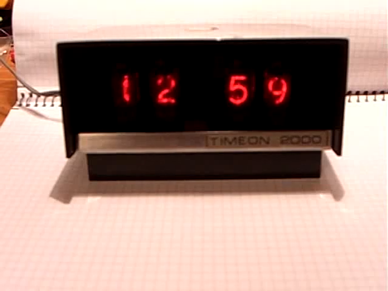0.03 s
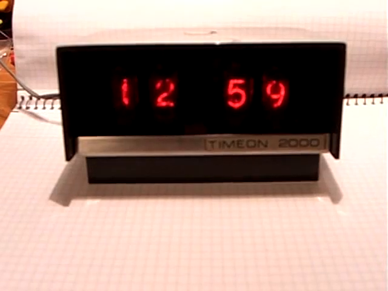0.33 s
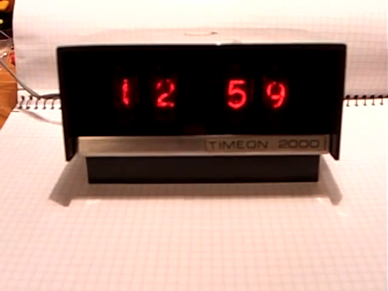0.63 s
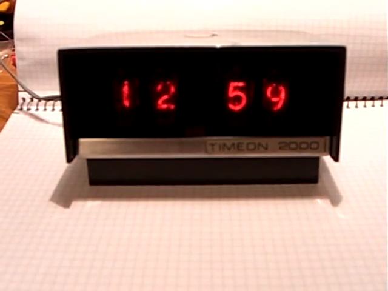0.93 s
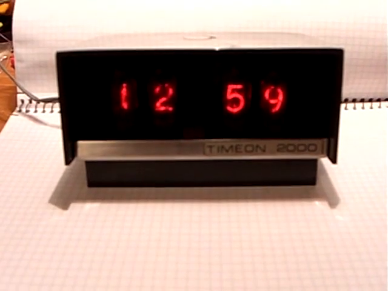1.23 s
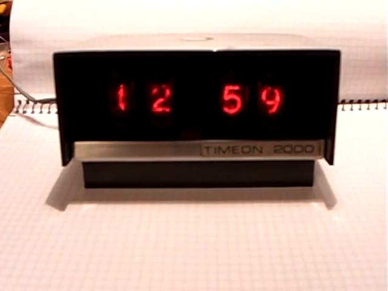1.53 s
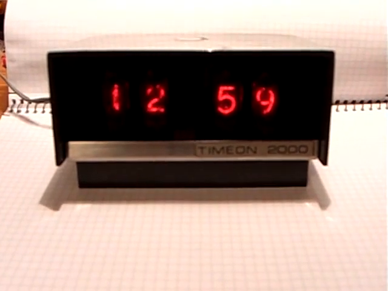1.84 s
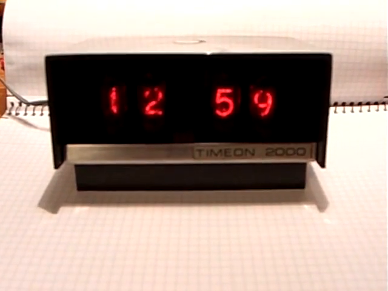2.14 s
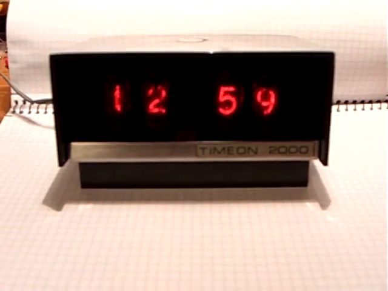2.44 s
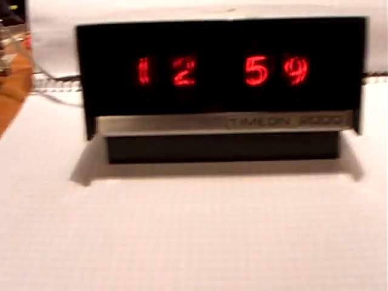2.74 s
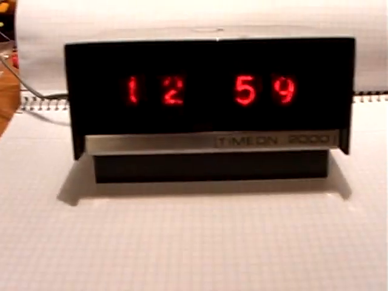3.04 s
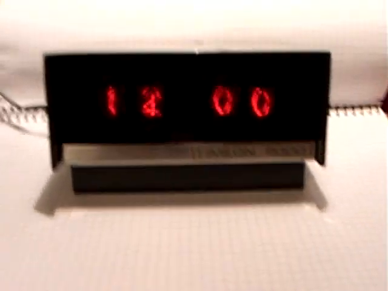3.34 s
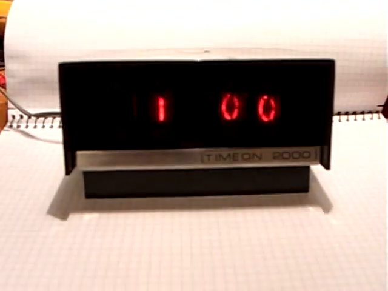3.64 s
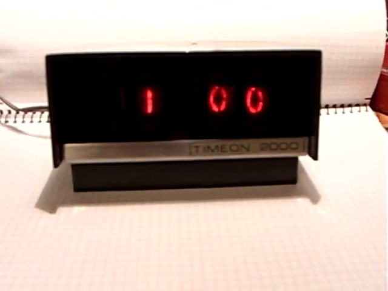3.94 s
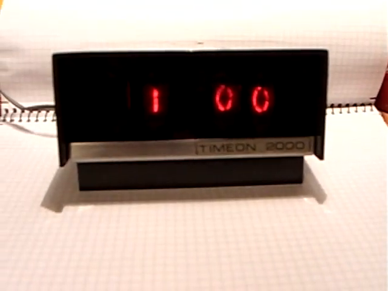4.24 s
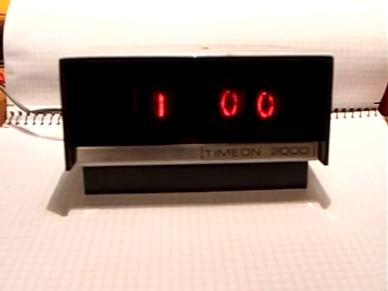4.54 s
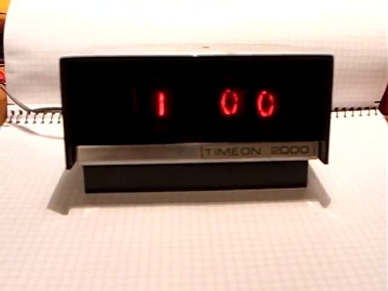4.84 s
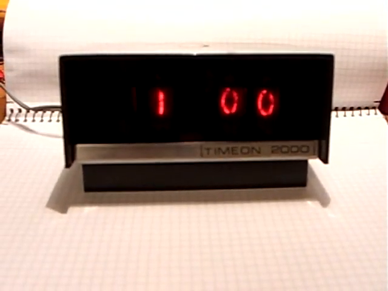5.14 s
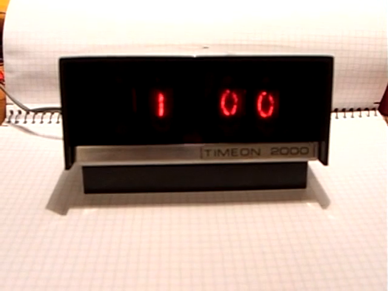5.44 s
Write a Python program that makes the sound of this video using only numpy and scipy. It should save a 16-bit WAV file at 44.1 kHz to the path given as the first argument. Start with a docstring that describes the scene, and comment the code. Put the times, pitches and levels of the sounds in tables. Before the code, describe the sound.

A low hum, even hiss and faint electrical buzz and whine fill a quiet room, with one light tick near the start. After a pause, a motor-driven digit clock close to the microphone changes its digits: the levers judder, snap sharply and knock in a plastic case over a low rumble. Soft, hissy rubbing runs between the snaps. A few lighter knocks follow as the mechanism settles, leaving the hiss.

```python
"""A low hum and hiss are heard first, with the faint buzz and whine of a small handheld camera, in a quiet
room. After one light snap and a pause, a motor-driven digit clock close by rolls over to the next hour.
Its levers judder, snap and knock over a low rumble, each contact exciting the damped normal modes of a
plastic case and its base. Between the snaps come soft rubbing strokes with a ringing hiss, perhaps from
handling the camera."""
import sys
import numpy as np
from scipy import signal
from scipy.fft import rfft, irfft, next_fast_len
from scipy.io import wavfile

SR = 44100
rng = np.random.default_rng(int(sys.argv[2]) if len(sys.argv) > 2 else 0)


def dump(signal):
    """Clip the signal to [-1, 1] and save it as 16-bit WAV at the path in sys.argv[1]."""
    limited = np.clip(np.atleast_2d(signal).T, -1, 1)
    pcm = np.round(limited * 32767).astype(np.int16)
    wavfile.write(sys.argv[1], SR, pcm)


N = 250488

# spectrum of the room's hiss: (frequency [Hz], relative density [dB])
HISS_SPECTRUM = [(21, -3), (71, -8.5), (126, -8), (191, -1.5), (261, -3), (321, -7), (401, -3.5),
                 (551, -7.5), (1110, -9.5), (3510, -13.5), (7010, -16), (11010, -17.5), (14010, -16),
                 (16010, -23.5)]
# the camera's two electronic tones: (frequency [Hz], level [dB])
WHINE_TONES = [(13184, -67.5), (15210, -63.5)]
# modes rung by the contacts and the rubbing: (frequency [Hz], t60 [s], relative level [dB])
BODY_MODES = [(504, 0.027, -20), (586, 0.032, -12), (748, 0.05, -21.5), (914, 0.027, -14),
              (1134, 0.011, -0.5), (1454, 0.021, -8.5), (1694, 0.018, -6), (2010, 0.0088, 2.5),
              (2994, 0.012, -1), (3500, 0.0082, 1.5), (4620, .008, -9.5), (6030, 0.0053, -8),
              (6320, 0.0094, -8.5), (7260, 0.0045, -2.5), (8130, 0.0071, -10), (9740, 0.0057, -12.5),
              (11690, 0.0083, -6), (12180, 0.004, -4), (14600, .006, -10)]
# normal modes of the base the clock stands on: (frequency [Hz], t60 [s], relative level [dB])
BASE_MODES = [(89, 0.05, -8), (150, 0.023, 0.5), (218, 0.027, 2.5), (301, 0.037, -1), (400, 0.03, -4.5)]
# hard contacts of the levers: (time [s], level [dB], favoured pitch [Hz], its boost [dB], treble [dB])
LEVER_SNAPS = [(0.181, -47, 2250, 1, 0), (2.5106, -40.5, 1550, 5, -1), (2.5936, -20, 540, -0.5, -2.1),
               (2.8534, -33.5, 1660, 13, -3.5), (2.9099, -29.5, 1550, 8.5, -0.5), (2.9888, -42, 3600, 4, 3),
               (3.1495, -20.5, 1330, 15, -1.3), (3.1562, -26.5, 560, 23, 9), (3.9987, -48.5, 2800, 9, -6)]
# the works rumble as they start and as they settle: (peak time [s], rise [s], fall [s], level [dB])
RUMBLE_SWELLS = [(2.55, 0.021, 1.8, -55), (3.52, 0.39, 0.87, -54.5)]
# spectrum of that rumble: (frequency [Hz], relative density [dB])
RUMBLE_SPECTRUM = [(41, -37), (121, -14.5), (221, -14.5), (335, -0.5), (455, -4.5), (655, -8.5),
                   (1210, -15.5), (3010, -28)]
# a lever judders twice, later the settling parts scuff: (peak time [s], rise [s], fall [s], level [dB])
JUDDER_SWELLS = [(2.531, .003, .075, -35.5), (2.59, 0.031, 0.019, -38.5), (4.112, .012, 0.042, -51.5),
                 (4.256, 0.018, .07, -53.5)]
# soft contacts: (time [s], level [dB], favoured pitch [Hz], its boost [dB], relative thud [dB])
LEVER_KNOCKS = [(2.5301, -35, 905, 18, -10), (2.541, -41, 1100, 0, 0), (2.568, -37, 880, 17, -16),
                (2.7103, -35.5, 560, 18, -15), (2.7917, -31.3, 915, 12, -10.5), (2.99, -52, 900, 4, 7),
                (3.074, -40.5, 1610, 15, -2), (3.132, -50.5, 905, 4, 5), (3.382, -53, 1700, 6, 8.5),
                (3.4022, -49, 1710, 15, -15), (3.4234, -41, 1360, 17, -5.5), (3.8423, -44.5, 790, 28, -12),
                (3.9986, -36.5, 740, 28.5, -23), (4.1255, -49.5, 1770, 13, -9), (4.253, -54.5, 706, 4, 3),
                (4.399, -50.5, 1135, 10, -12)]
# rubbing strokes: (peak time [s], rise [s], fall [s], favoured pitch [Hz], ring [dB], hiss [dB])
RUBBING_STROKES = [(2.62, .02, 0.78, 1400, -55, -62), (2.878, 0.066, 0.056, 1380, -46.5, -52.5),
                   (2.964, 0.042, 0.065, 1950, -45, -53.5), (3.03, .06, 0.027, 1950, -42, -52),
                   (3.068, 0.061, 0.1, 1720, -51, -44), (3.255, 0.14, 0.16, 1290, -48.5, -49),
                   (3.48, 0.062, 0.11, 1780, -46, -64), (3.566, 0.1, 0.058, 1980, -39, -43)]
# hiss of the early and the late strokes: (frequency [Hz], relative density [dB])
EARLY_HISS = [(2500, -14.5), (3750, 0), (4600, -11), (5500, -13), (6200, -1.5), (7600, -9), (8200, 0),
              (9100, -0.5), (10600, -7), (12300, -5), (14000, -18.5), (16000, -8)]
LATE_HISS = [(2500, -39), (4300, -7), (5300, -7), (6200, 3), (7300, -7), (8300, -5), (9000, -15),
             (10800, -14), (11600, -3), (13200, -6), (16000, -23)]
# narrow notches of the microphone channel: (frequency [Hz], width [Hz])
CHANNEL_NOTCHES = [(4360, 125), (6590, 130), (8690, 280), (10850, 170), (13010, 560)]


def undb(db):
    """Amplitude ratio of a level in decibels."""
    return 10 ** (np.asarray(db) / 20)


def unit(x):
    """Normalisation to rms 1."""
    return x / np.sqrt(np.mean(x ** 2))


def equal_energy(x):
    """Normalisation of a transient to the energy of 5 ms at rms 1."""
    return x * np.sqrt(.005 * SR / np.sum(x ** 2))


def colour(x, spectrum):
    """Spectral shaping by (frequency [Hz], level [dB]) points; rms 1."""
    hz, db = np.transpose(spectrum)
    size = next_fast_len(len(x), True)
    bin_hz = np.maximum(np.fft.rfftfreq(size, 1 / SR), 1)
    gain = undb(np.interp(np.log(bin_hz), np.log(hz), db))
    return unit(irfft(rfft(x, size) * gain, size)[:len(x)])


def band(hz, width_hz):
    """Response of one resonator to white noise; rms 1."""
    return unit(signal.lfilter(*signal.iirpeak(hz, hz / width_hz, fs=SR), rng.standard_normal(N)))


def fade(t, t60):
    """Exponential damping by 60 dB in t60."""
    return np.exp(-np.log(1000) * t / t60)


def swell(peak_s, rise_s, fall_s):
    """Exponential growth by 20 dB in rise_s and decay by 20 dB in fall_s; silent below -40 dB."""
    t = np.arange(N) / SR - peak_s
    db = -20 * np.maximum(-t / rise_s, t / fall_s)
    return undb(db) * (db > -40)


def background(hiss_db=-53, hum_db=-64):
    """Broadband noise is heard as an even hiss, narrowband noise as a wavering hum."""
    hum = band(hz=235, width_hz=6)
    hiss = colour(rng.standard_normal(N), HISS_SPECTRUM)
    return undb(hiss_db) * hiss + undb(hum_db) * hum


def camera_buzz(frame_hz=30, broad_db=-55, whistle_db=-56, burst_s=.0013):
    """Electrical interference: two noise bursts in each picture frame buzz, and two high tones whine."""
    t = np.arange(N) / SR
    frame, in_frame_s = np.divmod(t, 1 / frame_hz)
    bursts = sum(size * np.exp(-((in_frame_s - s) / burst_s) ** 2)
                 for s, size in [(.0189, 1), (.0228, .75)])
    fizz = undb(broad_db) * band(hz=5460, width_hz=6000) + undb(whistle_db) * band(hz=12460, width_hz=380)
    lower, upper = (undb(db) * np.sin(2 * np.pi * hz * t) for hz, db in WHINE_TONES)
    return bursts * fizz + lower + upper * (-1) ** frame  # the upper tone flips sign with every frame


def ring_modes(modes, spread_cycles=.45):
    """Free vibration is a sum of damped sines, here slightly detuned at random on each excitation."""
    t = np.arange(SR // 16) / SR
    hz, t60, db = np.transpose(modes)[:, :, None]
    detune, phase = rng.standard_normal((len(modes), 2)).T[:, :, None]
    cycles = hz * (1 + .01 * detune) * t
    onset = (1 - np.exp(-cycles / spread_cycles)) ** 2  # the wave takes a cycle or two to fill the shell
    return np.sum(undb(db) * onset * fade(t, t60) * np.sin(2 * np.pi * (cycles + phase)), axis=0)


def body_ring(pitch_hz, boost_db, treble_db, bright_hz=2300, width_octaves=.36):
    """Modal excitation: the contact point favours modes near one pitch, a hard contact the high ones."""
    hz, t60, db = np.transpose(BODY_MODES)
    favoured = np.exp(-(np.log2(hz / pitch_hz) / width_octaves) ** 2)
    tilt = np.clip(1 + np.log2(hz / bright_hz), 0, 2)
    return ring_modes(np.transpose([hz, t60, db + boost_db * favoured + treble_db * tilt]))


def impact(time_s, db, pitch_hz, boost_db, treble_db, thud_db):
    """Impulsive excitation: the case rings, the contact cracks briefly and the base thuds."""
    ring = equal_energy(body_ring(pitch_hz, boost_db, treble_db))
    t = np.arange(len(ring)) / SR
    highpass = signal.butter(4, 6000, "high", fs=SR, output="sos")
    grit = signal.sosfilt(highpass, rng.standard_normal(len(t)))
    crack_db = -14 + 2 * treble_db - boost_db / 2
    crack = undb(crack_db) * equal_energy(grit * fade(t, t60=.016))
    thud = undb(thud_db) * equal_energy(ring_modes(BASE_MODES))
    return np.pad(undb(db) * (ring + crack + thud), (int(time_s * SR), N))[:N]


def snaps():
    """A short contact has a wide spectrum: the sprung levers snap brightly and hardly move the base."""
    return sum(impact(*snap, thud_db=-36) for snap in LEVER_SNAPS)


def reverberation(x, echo_db=-25, t60=.14, cutoff_hz=4200):
    """Absorption in a small furnished room leaves weak, dull reflections that decay exponentially."""
    t = np.arange(SR // 3) / SR
    dull_noise = signal.lfilter(*signal.butter(1, cutoff_hz, fs=SR), rng.standard_normal(len(t)))
    tail = dull_noise * fade(t, t60)
    return undb(echo_db) * signal.fftconvolve(x, tail / np.linalg.norm(tail))[:N]


def slips(per_s, spread_db):
    """Stick-slip friction as a random train of impulses of uneven size; rms 1."""
    slipping = rng.random(N) < per_s / SR
    return unit(slipping * rng.choice([-1, 1], N) * undb(spread_db * rng.standard_normal(N)))


def rumble():
    """Shot noise: soft irregular bumps merge into a low rumble while the works are moving."""
    envelope = sum(undb(db) * swell(*timing) for *timing, db in RUMBLE_SWELLS)
    return envelope * colour(slips(per_s=900, spread_db=2.5), RUMBLE_SPECTRUM)


def judder(thud_db=-4):
    """Stick-slip motion: a loaded lever creeps in coarse slips that ring the case and shake the base."""
    creep = slips(per_s=1100, spread_db=3)
    envelope = sum(undb(db) * swell(*timing) for *timing, db in JUDDER_SWELLS)
    ring = equal_energy(body_ring(pitch_hz=850, boost_db=13, treble_db=-4.5))
    thud = undb(thud_db) * equal_energy(ring_modes(BASE_MODES))
    return envelope * unit(signal.oaconvolve(creep, ring + thud)[:N])


def knocks():
    """A soft contact excites the high modes weakly: the levers knock dully and shake the base."""
    return sum(impact(time_s, db, pitch_hz, boost_db, treble_db=-5.5, thud_db=thud_db)
               for time_s, db, pitch_hz, boost_db, thud_db in LEVER_KNOCKS)


def rubbing(late_from_s=3.4):
    """Sliding friction: soft rubbing strokes with a ringing hiss, perhaps from handling the camera."""
    out = np.zeros(N)
    grain = slips(per_s=7000, spread_db=3.5)
    for peak_s, rise_s, fall_s, pitch_hz, ring_db, hiss_db in RUBBING_STROKES:
        envelope = swell(peak_s, rise_s, fall_s)
        moving = envelope > 0
        friction = grain[moving]
        response = body_ring(pitch_hz, boost_db=6, treble_db=-5.5)
        ring = unit(signal.fftconvolve(friction, response)[:len(friction)])
        hiss = colour(friction, EARLY_HISS if peak_s < late_from_s else LATE_HISS)
        out[moving] += envelope[moving] * (undb(ring_db) * ring + undb(hiss_db) * hiss)
    return out


def scene():
    """Superposition of the clock and the rubbing, their reflections and the steady background."""
    direct = snaps() + knocks() + judder() + rubbing() + rumble()
    return (direct + reverberation(direct) + background() + camera_buzz())[None]


def record(dry, open_s=.036, cutoff_hz=15800):
    """Linear filtering: the microphone channel opens after a moment, notches and cuts the treble."""
    x = dry * (np.arange(N) / SR > open_s)
    for hz, width_hz in CHANNEL_NOTCHES:
        x = signal.lfilter(*signal.iirnotch(hz, hz / width_hz, fs=SR), x)
    return signal.sosfilt(signal.ellip(10, .2, 70, cutoff_hz, fs=SR, output="sos"), x)


dry = scene()
out = record(dry)
dump(out)
```